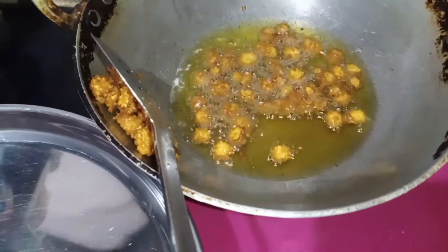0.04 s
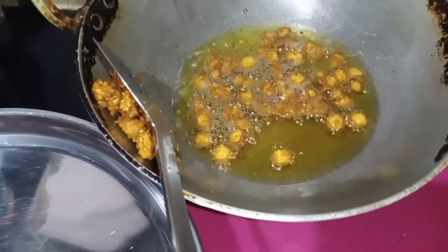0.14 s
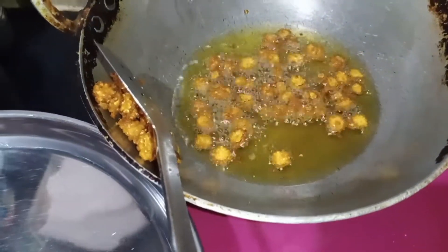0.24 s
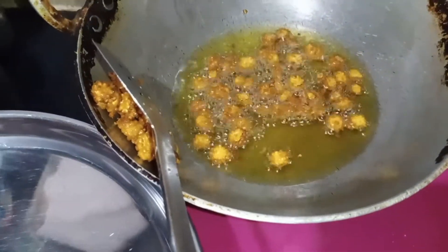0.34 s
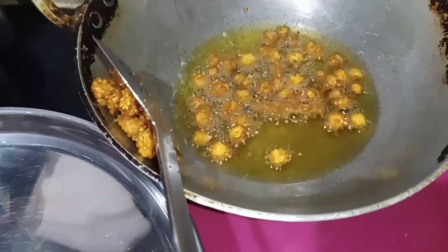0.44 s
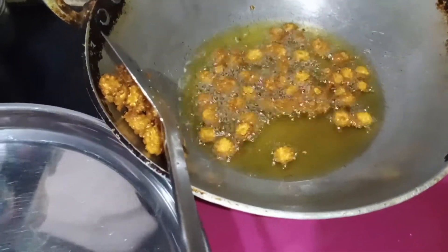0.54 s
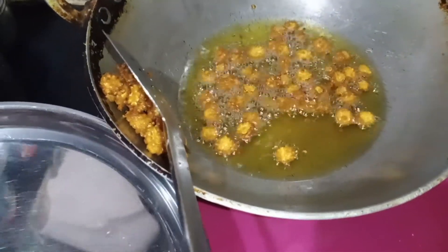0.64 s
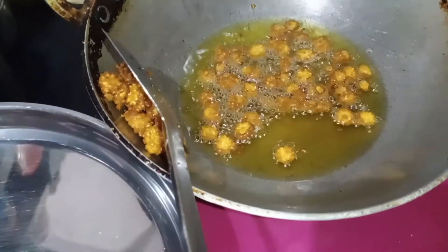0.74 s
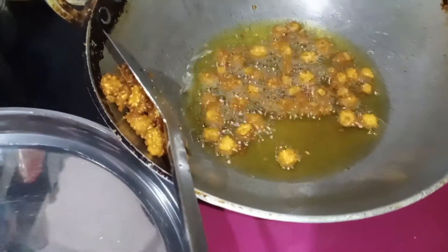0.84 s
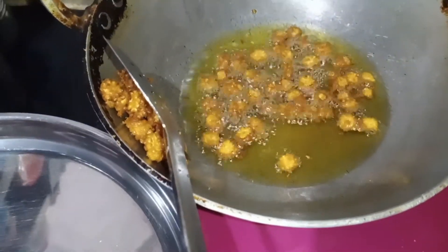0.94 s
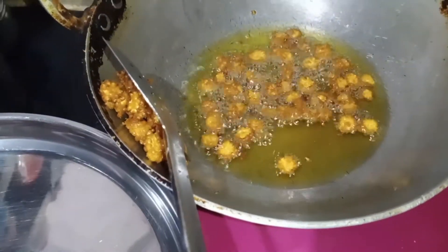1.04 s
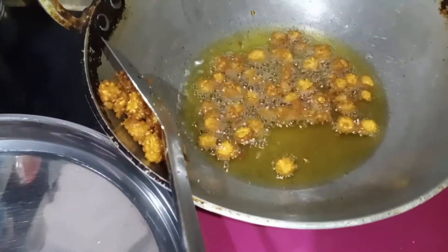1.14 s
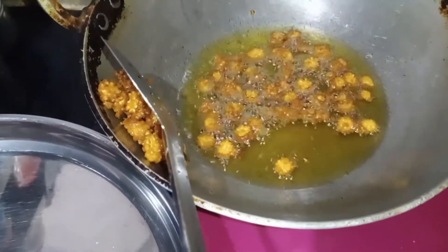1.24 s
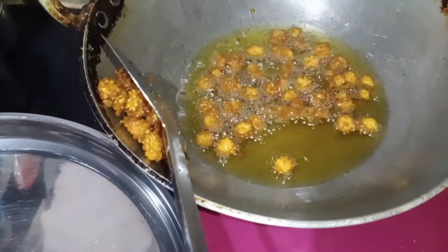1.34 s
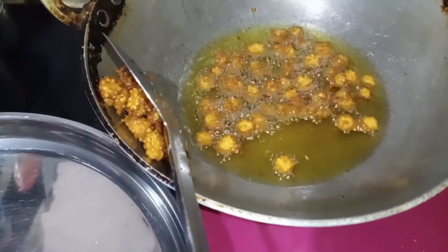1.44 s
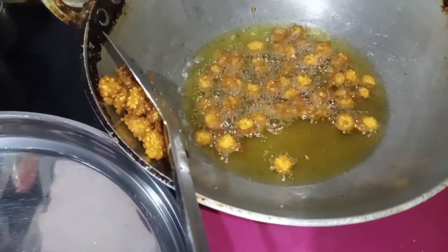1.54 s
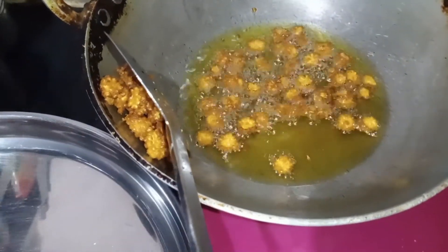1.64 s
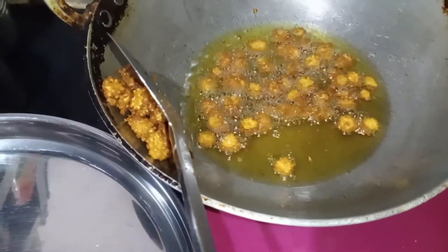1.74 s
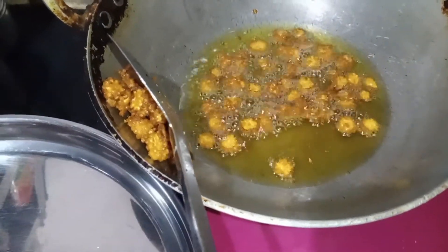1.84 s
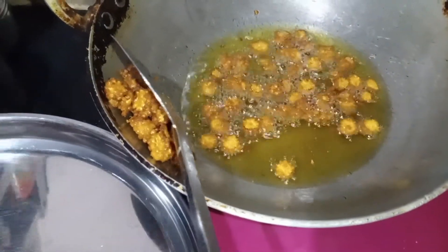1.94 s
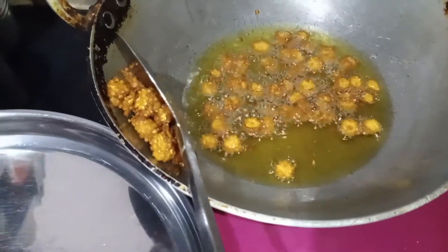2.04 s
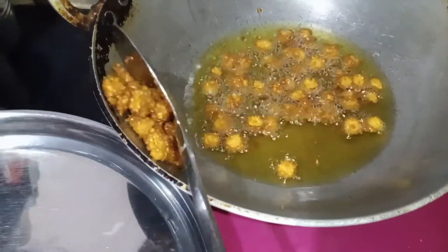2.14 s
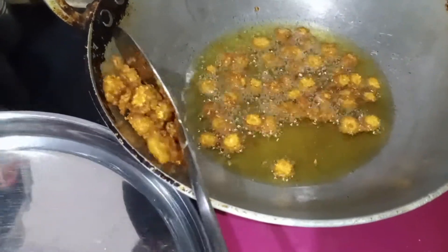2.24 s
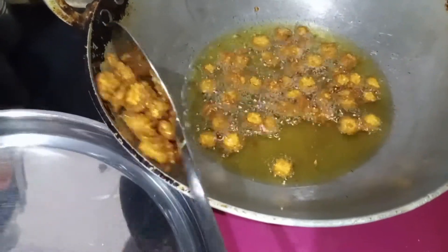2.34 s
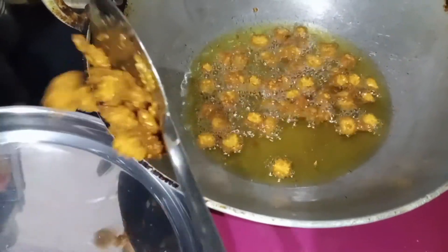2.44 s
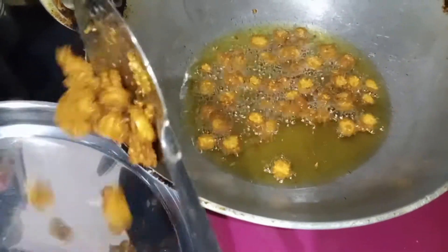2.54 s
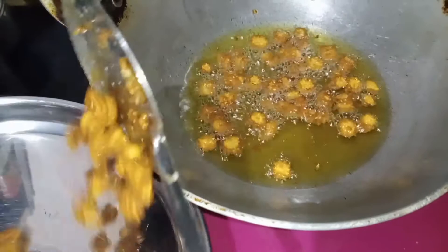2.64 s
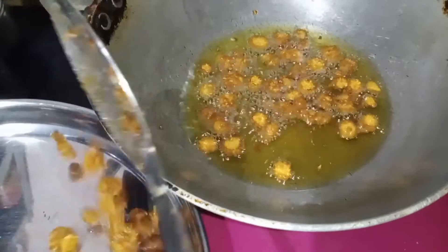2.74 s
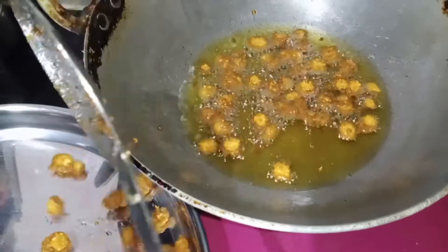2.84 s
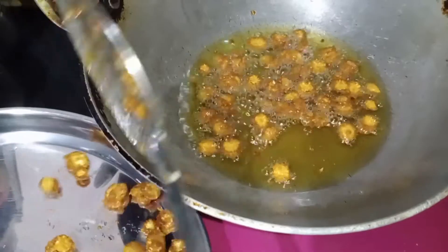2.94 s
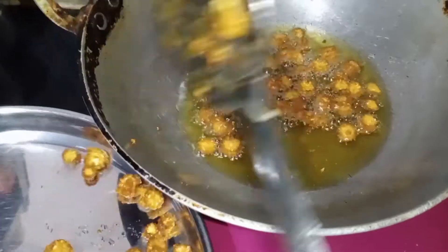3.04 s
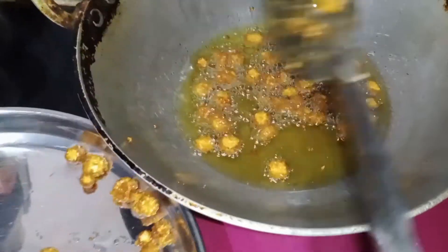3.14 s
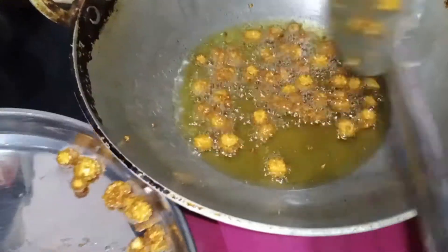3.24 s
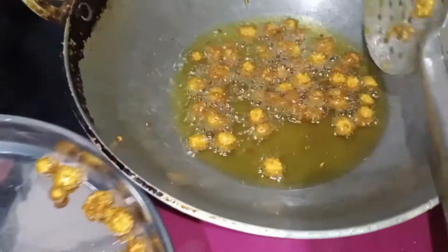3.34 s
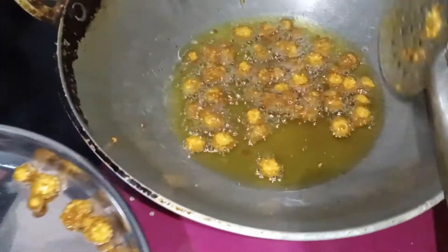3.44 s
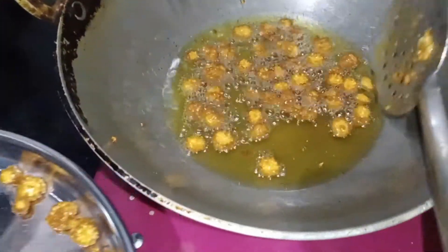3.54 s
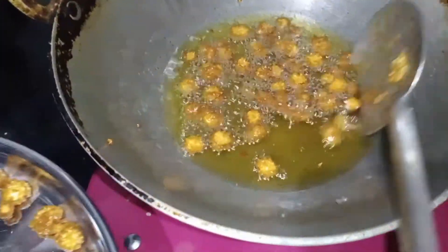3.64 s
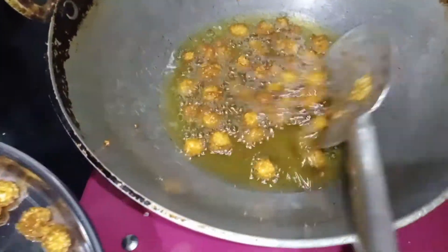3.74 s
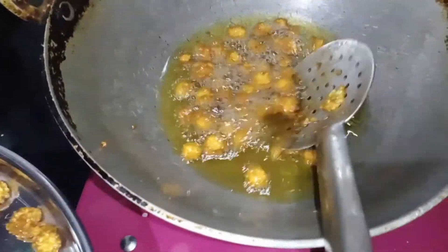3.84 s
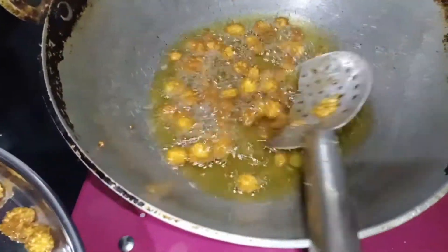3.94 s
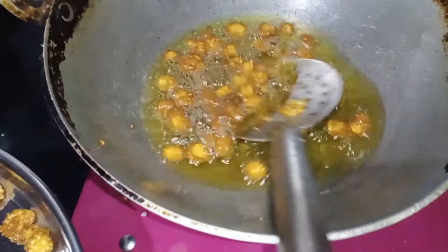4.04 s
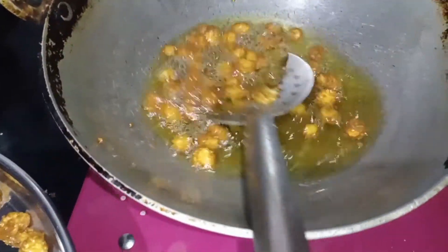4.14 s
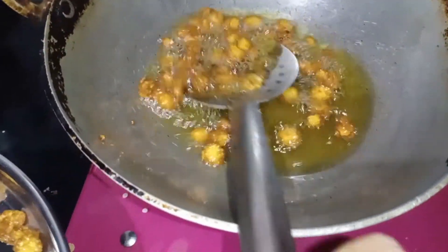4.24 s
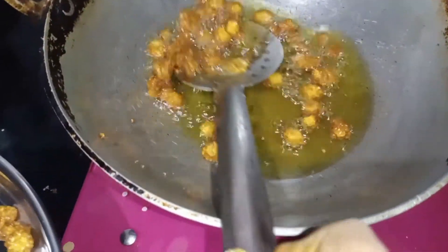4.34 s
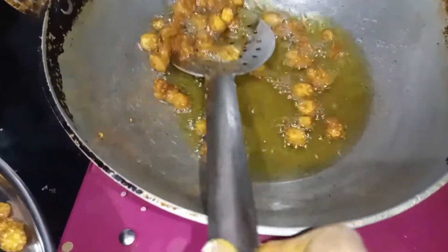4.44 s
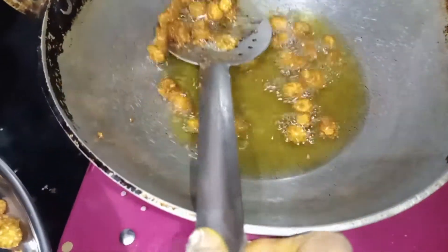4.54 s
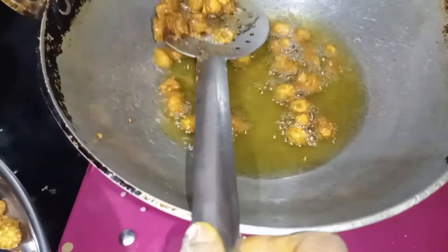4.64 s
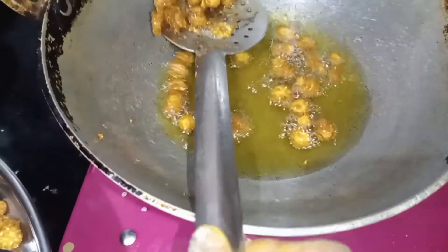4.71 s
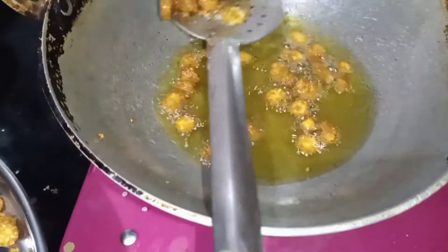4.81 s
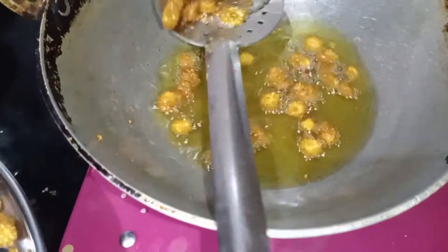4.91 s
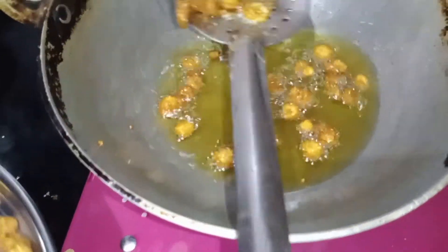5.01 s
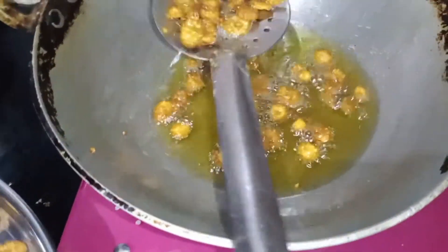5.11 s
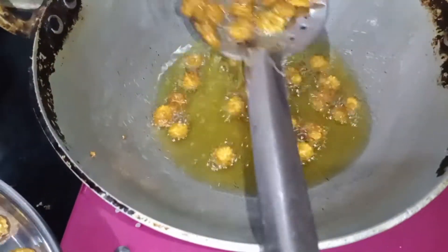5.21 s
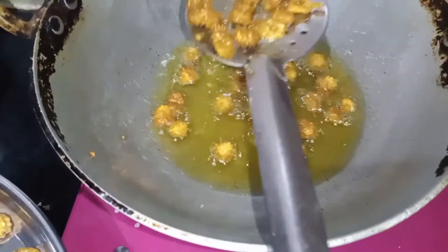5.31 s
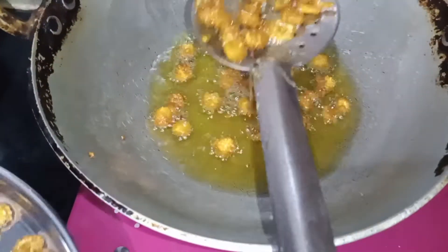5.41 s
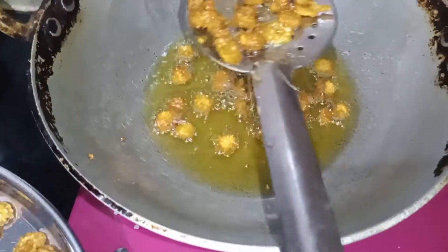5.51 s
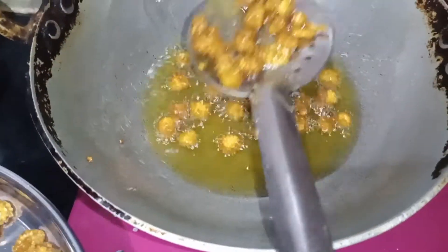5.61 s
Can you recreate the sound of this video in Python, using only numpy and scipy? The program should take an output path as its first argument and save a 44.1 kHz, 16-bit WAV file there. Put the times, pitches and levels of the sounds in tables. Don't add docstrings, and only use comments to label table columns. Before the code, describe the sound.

Hot oil fizzes and crackles steadily while a metal slotted spoon scrapes a steel wok, tips fried bits onto a ringing plate, then stirs.

```python
import sys
import numpy as np
from scipy import signal
from scipy.fft import rfft, irfft, next_fast_len
from scipy.io import wavfile
from scipy.ndimage import uniform_filter1d

SR = 44100
rng = np.random.default_rng(int(sys.argv[2]) if len(sys.argv) > 2 else 0)


def invert_db(x):
    u = np.asarray(x, float) / 20
    return 10 ** u


def transcribe(signal):
    frames = np.atleast_2d(signal).T
    limited = np.clip(frames, -1, 1)
    pcm = np.round(limited * 32767).astype(np.int16)
    wavfile.write(sys.argv[1], SR, pcm)


N = 250035
SIZE = next_fast_len(N + SR // 2)
BINS = np.maximum(np.arange(SIZE // 2 + 1) * SR / SIZE, 1)

# low_hz, high_hz
REGISTERS = [
    (150, 560),
    (560, 1520),
    (1520, 5000),
    (5000, 10200),
    (10200, 17000),
]


def fizz():
    # start_s, level_db
    frying = [(0, -38.5), (.25, -37.8), (1.9, -38.3), (2.5, -37.5), (3.0, -39), (3.45, -40), (3.85, -38),
              (4.3, -35.5), (4.6, -35.5), (5.3, -37.5), (5.67, -38.5)]
    # pitch_hz, level_db (per Hz)
    fizz_colour = [(530, -61.5), (900, -25.5), (978, -34), (1270, -21.5), (2040, -19.5), (2870, -5.5),
                   (3190, -7.5), (4290, -12), (4940, -17.5), (6410, 0.5), (6800, 2.5), (7650, -2),
                   (8720, -11.5), (11600, -20), (15200, -14.5)]
    bursts = grains(9000 * invert_db(2.1 * drift(14) + 1.5 * drift(60)), spread_db=0.0)
    bubble_size = rng.integers(0, 18, N)
    pops = np.zeros(N)
    for k, hz in enumerate(np.geomspace(900, 16000, 18)):
        pops += rms_one(ring(bursts * (bubble_size == k), hz, hz / 3.5)) * np.sqrt(hz)
    crackle = invert_db(-7.0) * puffs(400 * invert_db(3.5 * drift(1.5)), t60=0.052)
    spitting = invert_db(-18.5) * puffs(45, t60=0.057)
    hiss = rng.standard_normal(N)
    mixed = colour(rms_one(pops) + crackle + spitting + hiss, at_hz(fizz_colour))
    return in_time(frying)[0] * band_one(mixed, 5500, 8500)


def spits():
    # start_s, peak_db, pitch_hz, hiss_db (above the peak)
    spit_events = [(0.957, -26, 3260, -8), (1.512, -24.5, 2980, 2), (4.0648, -14.5, 3100, -3),
                   (4.2302, -41, 3270, 23), (4.484, -14, 3420, -10), (4.5008, -16, 3150, -23),
                   (4.67, -24, 3220, -4), (4.8534, -24.5, 2850, 12), (4.919, -18.5, 2400, -10),
                   (4.992, -21, 3210, -10), (5.1165, -32, 2990, 17), (5.1856, -21, 3400, -11.5),
                   (5.35, -30, 3300, -2), (5.4043, -20.5, 2580, 6), (5.5844, -32, 3100, 6)]
    out = np.zeros(N)
    fade = invert_db(-60 * np.arange(900) / (0.056 * SR))
    for s, peak_db, pitch_hz, hiss_db in spit_events:
        puff = rng.standard_normal(900) * fade
        for hz, width_hz, level_db in ((pitch_hz, 500, 0), (7000, 2500, hiss_db)):
            blip = ring(ring(puff, hz, width_hz), hz, width_hz)
            out[round(s * SR):][:900] += invert_db(peak_db + level_db - 11.5) * blip / np.abs(blip).max()
    return above(out, 2140)


def gurgle():
    # peak_s, half_length_s, peak_db
    bubbling = [(.2, 0.044, -66), (.33, .025, -66), (.445, 0.015, -64), (.575, 0.021, -61.5),
                (.67, 0.035, -60), (.845, 0.031, -56), (.93, .02, -60), (1.0, 0.03, -61), (1.07, .03, -63),
                (1.35, 0.044, -64), (1.68, 0.11, -63.5), (2.1, 0.046, -73), (3.15, 0.13, -62),
                (3.32, 0.046, -67), (4.52, .06, -84), (4.75, 0.046, -57), (4.97, 0.082, -63),
                (5.23, 0.045, -75), (5.56, 0.14, -57)]
    # peak_s, half_length_s, peak_db
    slosh = [
        (4.4, 0.14, -57),
        (4.6, 0.13, -57.5),
        (4.85, 0.11, -56.5),
    ]
    return swells(bubbling) * hum(762, 100) + swells(slosh) * above(hum(1320, 540), 1000)


def spoon_drag():
    # pitch_hz, width_hz, level_db
    wall = [(370, 46, -5), (759, 35, -0.5), (890, 30, -3), (1170, 49, -9), (1593, 56, -7), (2700, 40, 2),
            (3210, 95, 6), (3730, 200, 7), (4100, 73, 2.5), (6380, 120, 10), (6400, 68, -35), (7350, 74, 5)]
    # start_s, level_db (pressure), weight_db (dull sound above the level)
    drag = [
        (1.88, -65, -22),
        (1.928, -49, -30),
        (2.012, -54, -13),
        (2.044, -43, -26),
        (2.132, -48, -31),
        (2.2, -33, 5),
        (2.26, -48, 4),
        (2.348, -39, -8),
        (2.54, -50.5, -4),
    ]
    # start_s, peak_db, weight_db (dull above peak), bright_db (above peak), pitch_hz (favoured)
    drag_knocks = [
        (1.9068, -30, -46, 5, 3200),
        (1.921, -27, -37, 2, 3200),
        (2.0365, -31, -40, 14.5, 3200),
        (2.0534, -33.5, -31, 14.5, 3230),
        (2.1717, -27, -5, 5, 3200),
        (2.1972, -14, -34, -0.5, 3800),
        (2.362, -27, -36, -4, 2700),
        (2.4292, -32, -24, 15, 2600),
    ]
    return steel(wall, rubbing(drag, body_db=-10.5, bright_db=6.0), with_body(drag_knocks, body_db=-1.0),
                 uneven_db=2.0, sharpness=2.8, ring_db=-6.5, rub_ring_db=-2.0, noise_db=-4.5,
                 top_share_db=-11.5, per_s=2800, t60=0.034, crack_s=0.0067)


def plate_tumble():
    # pitch_hz, width_hz, level_db
    plate = [(220.5, 60, -18.5), (389.7, 51, -14), (461, 65, -17), (722.5, 50, 3), (938, 28, -1.5),
             (1168, 11, -1.5), (1453, 36, -11), (1753, 110, -5.5), (2075, 24, -3), (2423, 18, -1),
             (2784, 40, -0.5), (2848, 24, 0.5), (3150, 28, -7), (3334, 30, -8), (3275, 14, 1),
             (3450, 54, -8.5), (3695, 30, -7.5), (4020, 30, -13), (4100, 110, -5), (4290, 45, -10.5),
             (4740, 100, -9.5), (5260, 25, -13), (5760, 35, -8), (6170, 67, -11), (6600, 75, -9),
             (6890, 36, -8.5), (7290, 63, -3), (7260, 11, -24), (8200, 28, -7), (9240, 35, -18),
             (10100, 90, -21)]
    # start_s, level_db (pressure), weight_db (dull sound above the level)
    tumble = [
        (2.543, -51, 6),
        (2.551, -46, 1),
        (2.59, -34, -0.5),
        (2.641, -28.5, -3),
        (2.66, -28, -3.5),
        (2.8, -30, -2.5),
        (2.85, -35.5, -10),
        (2.98, -38.5, -16),
        (3.1, -59, -8),
    ]
    # start_s, peak_db, weight_db (dull above peak), bright_db (above peak), pitch_hz (favoured)
    plate_knocks = [(2.5451, -25, 1.5, 10.5, 3290), (2.5905, -22.5, 0.5, 5.5, 2700),
                    (2.6094, -23.5, -5, -1, 3290), (2.6486, -25, -6, 10.5, 3100),
                    (2.6566, -18.5, -9, 5, 3275), (2.6894, -20.5, -4, 3, 3275),
                    (2.7194, -16.5, -1, -1, 3480), (2.7444, -19, -5, 6, 2600),
                    (2.7694, -18.5, -3, -4, 3020), (2.7894, -20.5, -2.5, 6, 2600),
                    (2.7985, -16, -9, -17, 2080), (2.8671, -23, -12, 6.5, 2080),
                    (2.917, -28, -5, 7.5, 2800), (2.9494, -25, -4, -1, 3350)]
    return steel(plate, rubbing(tumble, body_db=4.0, bright_db=-2.0), with_body(plate_knocks, body_db=-13.5),
                 uneven_db=3.2, sharpness=8.5, ring_db=-8.5, rub_ring_db=1.5, noise_db=-6.0,
                 top_share_db=-4.0, per_s=1500, t60=0.17, crack_s=0.004)


def wok_stir():
    # pitch_hz, width_hz, level_db
    wok = [(260, 28, -8), (375.2, 37, 4), (760, 20, 0.5), (892, 38, 0), (1004, 45, 1.5), (1200, 105, 5),
           (1303, 37, -5), (1698, 76, 5.5), (2080, 23, -8), (2700, 73, -1.5), (1440, 56, -0.5),
           (2850, 60, -2), (2983, 63, -2), (3490, 50, -14), (4047, 60, -3.5), (5800, 44, -2),
           (6520, 99, 6.5), (7020, 40, 2), (7680, 35, -3)]
    # start_s, level_db (pressure), weight_db (dull sound above the level)
    stir = [
        (3.46, -68, 2),
        (3.482, -44, 0.5),
        (3.492, -50, 4),
        (3.498, -28, -7.5),
        (3.564, -38, -3.5),
        (3.622, -27.5, -6.5),
        (3.69, -29, -3),
        (3.774, -29, -6.5),
        (3.88, -44.5, -9),
    ]
    scoop = [
        (3.88, -50.5, 0.5),
        (3.95, -38, -10.5),
        (4.036, -30.5, -13.5),
        (4.102, -46, 7.5),
        (4.198, -56, 7.5),
        (4.35, -54, -8),
    ]
    drain = [
        (5.38, -49, -23),
        (5.414, -47, -11.5),
        (5.54, -49, -2.5),
        (5.67, -72, -24),
    ]
    # start_s, peak_db, weight_db (dull above peak), bright_db (above peak), pitch_hz (favoured)
    wok_knocks = [(3.477, -29.5, 1, -16, 2980), (3.499, -9, -24, -1, 2646), (3.5845, -15, -13, -4, 3010),
                  (3.6112, -23, -18, 3, 3060), (3.6546, -17.5, -1, 6, 1645), (3.6965, -13.5, -9, 0.5, 4100),
                  (3.7394, -24.5, -24, 4, 4060), (3.788, -21.5, -7, 2.5, 4047),
                  (3.9499, -35, -29, 11, 1690), (4.0765, -30.5, 8.5, -12, 1004),
                  (4.084, -37.5, 10, -12, 760), (4.0945, -32.5, 6, -12, 1004), (4.1065, -35, 7, -12, 900),
                  (4.4847, -35, -14.5, 0, 1500), (4.7155, -47.5, 7, -6, 890), (4.729, -48, 7, -8, 1200)]
    pressure = rubbing(stir, body_db=4.0, bright_db=-3.0)
    pressure = pressure + rubbing(scoop, body_db=-16.5, bright_db=3.0)
    pressure = pressure + rubbing(drain, body_db=7.5, bright_db=-12.0)
    return steel(wok, pressure, with_body(wok_knocks, body_db=-10.5),
                 uneven_db=2.5, sharpness=2.24, ring_db=-4.0, rub_ring_db=-6.0, noise_db=-4.0,
                 top_share_db=-16.0, per_s=4000, t60=0.055, crack_s=0.0084)


def spoon_song():
    # peak_s, half_length_s, peak_db
    scrape = [
        (3.96, 0.02, -42.5),
        (3.995, 0.034, -39),
        (4.048, .018, -40),
    ]
    return swells(scrape) * (hum(1687, 67) + 0.86 * hum(1340, 110))


def ticks():
    # start_s, peak_db, middle_db (middle register above the peak)
    tick_events = [(0.957, -28.5, 3.5), (1.9067, -22, 0), (1.9704, -23, -6), (2.044, -20, -5),
                   (2.1092, -25, -6), (2.1976, -12.5, -4), (2.2654, -32, -8), (2.2928, -21, -14),
                   (2.3612, -21, -6), (2.387, -19, -7), (2.4584, -26, -13), (2.4948, -17.5, -13),
                   (2.5907, -13, -2), (2.648, -11, -12), (2.6544, -10, -12), (2.667, -16, -13),
                   (2.684, -15, -9), (2.7126, -13, -3), (2.7234, -21, -6), (2.7527, -19, -6),
                   (2.7686, -11, -6), (2.793, -11, -3), (2.8037, -8, -7), (2.8834, -16.5, 1.5),
                   (3.5684, -28, -5), (3.6244, -21, -6), (3.654, -10, -14), (3.7294, -23, -2),
                   (3.776, -19, -11), (3.9495, -24, -14), (4.0087, -17, -8), (4.0227, -21, -1),
                   (4.0334, -23, -2), (4.065, -24, 7), (4.086, -21, -4), (4.136, -30, -1),
                   (4.1954, -28, -9), (4.2314, -21, -16), (4.4845, -21, 2), (4.503, -20, -3)]
    bright, middle = np.zeros(N), np.zeros(N)
    fade = invert_db(-60 * np.arange(900) / (0.019 * SR))
    fade = fade + 1.06 * fade ** 10.0
    for s, peak_db, middle_db in tick_events:
        burst = invert_db(peak_db - 9) * rng.standard_normal(900) * fade
        bright[round(s * SR):][:900] += burst
        middle[round(s * SR):][:900] += invert_db(middle_db) * burst
    _, _, middle_response, bright_response, top_response = clatter_responses()
    out = signal.oaconvolve(bright, bright_response + invert_db(-22.0) * top_response)
    out = out + signal.oaconvolve(middle, middle_response)
    return above(out[:N], 2540)


def hollows():
    # peak_s, half_length_s, peak_db, pitch_hz
    short_tones = [(0.886, 0.025, -68, 432), (3.518, 0.021, -35, 2710), (2.375, 0.017, -41.5, 2700),
                   (2.2, 0.017, -50, 1700), (2.41, .015, -49, 2150), (2.505, 0.033, -49, 1600),
                   (2.185, 0.011, -43, 354), (3.55, 0.014, -34, 2780), (3.76, .018, -38, 4050),
                   (3.72, .025, -34, 2820), (3.665, .015, -42, 1000), (4.55, 0.03, -52, 1670),
                   (4.495, 0.014, -50, 1200), (4.78, .025, -55.5, 1100), (5.352, .005, -38, 8500),
                   (2.558, 0.014, -37, 9870), (2.56, .01, -52, 11900), (2.599, 0.02, -32, 394),
                   (2.78, 0.077, -51.5, 215), (5.05, .035, -63, 980), (5.27, 0.049, -61, 910),
                   (4.68, .03, -65, 460), (1.4, 0.042, -58.5, 220), (2.675, .035, -28, 2416),
                   (2.73, .02, -36, 2072), (2.815, .018, -33, 2078), (2.88, 0.018, -36.5, 2078),
                   (2.965, 0.018, -40, 3275), (2.93, 0.045, -41, 2850), (2.62, 0.028, -41, 4200),
                   (3.508, 0.012, -30, 4040), (3.703, 0.0078, -34, 4060), (3.6, .02, -43, 1700),
                   (3.8, .015, -41, 1700), (2.26, 0.045, -46.5, 377), (2.225, .02, -42, 890),
                   (2.22, .02, -46.5, 1590), (1.93, .012, -55, 1650), (2.6, .04, -41, 2770),
                   (2.66, .03, -38, 1600), (2.8, .06, -42, 1170), (3.63, .04, -40, 1450),
                   (2.93, 0.052, -51.5, 455), (2.984, 0.024, -52, 140), (3.215, 0.067, -62, 506),
                   (3.55, 0.05, -38.5, 272), (3.694, 0.055, -38, 297), (4.73, 0.026, -49, 108.4),
                   (4.922, 0.0099, -51, 139.6)]
    out = np.zeros(N)
    for s, half_s, peak_db, hz in short_tones:
        tone = np.sin(2 * np.pi * hz * np.arange(N) / SR)
        rough = 0.64 * hum(hz, min(hz / 13.3, 120.))
        out += swells([(s, half_s, peak_db)]) * (tone + rough)
    return out


def rumble():
    # pitch_hz, width_hz
    hum_modes = [
        (90, 28.6),
        (137, 19.4),
        (225, 123),
    ]
    # peak_s, half_length_s, peak_db
    low_swells = [(0.24, 0.06, -52), (0.493, 0.12, -57), (0.89, 0.22, -53.5), (1.218, 0.087, -44.5),
                  (1.573, 0.093, -41.5), (1.842, .15, -38.5), (2.285, 0.041, -48.5), (2.56, 0.073, -53),
                  (3.185, 0.026, -49), (3.308, 0.038, -41), (3.695, 0.2, -41), (4.175, 0.16, -46),
                  (4.45, 0.25, -53), (4.7, .06, -49), (4.909, 0.072, -47), (5.414, 0.15, -47.5)]
    upper_swells = [(.21, 0.028, -46), (.445, 0.021, -50), (.54, 0.04, -49.5), (.92, 0.2, -50),
                    (1.27, 0.27, -44.5), (1.55, 0.18, -52.5), (1.97, 0.065, -45.5), (2.28, 0.032, -53.5),
                    (2.6, 0.049, -39), (3.19, 0.021, -43), (3.3, 0.024, -45), (3.45, 0.073, -49),
                    (3.73, 0.28, -45.5), (4.13, 0.061, -44), (4.55, 0.041, -52), (4.97, 0.078, -49),
                    (5.48, 0.059, -46)]
    thuds = [(0.229, 0.023, -46), (1.77, 0.041, -47.5), (2.19, 0.017, -45.5), (2.66, 0.043, -56),
             (3.3, 0.023, -47), (3.62, 0.14, -46.5), (4.14, 0.05, -43.5), (4.861, 0.032, -46.5),
             (5.55, 0.084, -47)]
    groups = (low_swells, upper_swells, thuds)
    return sum(swells(rows) * hum(*mode) for rows, mode in zip(groups, hum_modes))


def room():
    # pitch_hz, level_db (per Hz)
    room_colour = [(18, -21), (30, -11), (65, -3.5), (129, -4), (344, -17), (673, -19.5), (754, -33),
                   (1010, -35), (1250, 1.5), (1500, -62), (1950, -12), (3300, -120)]
    return invert_db(-70.0) * band_one(colour(rng.standard_normal(N), at_hz(room_colour)), 236, 1172)


def steel(modes, rub, knocks, uneven_db, sharpness, ring_db, rub_ring_db, noise_db, top_share_db,
          per_s, t60, crack_s):
    grit = grains(per_s * invert_db(3.5 * drift(35)), spread_db=uneven_db)
    s, peak_db, body_db, dull_db, bright_db, favoured_hz = np.transpose(knocks)
    at = np.round(s * SR).astype(int)
    out, t = np.zeros(N), np.arange(6000) / SR
    levels = [*rub, rub[3] * invert_db(top_share_db)]
    offsets_db = (body_db, dull_db, 0, bright_db, bright_db + top_share_db)
    heard = slice(at[0] - SR // 10, None)
    crack = 0.38 * invert_db(-60 * t / crack_s)
    tail_lengths = (2.8, 3.4, 0.31, 1.64, 1.5)
    layers = zip(REGISTERS, clatter_responses(), levels, offsets_db, tail_lengths)
    for (low_hz, high_hz), response, level, above_db, lasting in layers:
        drive = level * grit
        blows = invert_db(peak_db + above_db)
        noise = drive.copy()
        fade = 0.33 * invert_db(-60 * t / (t60 * lasting)) + crack
        for start, blow in zip(at, blows):
            noise[start:start + 6000] += blow * rng.standard_normal(6000) * fade
        out += invert_db(noise_db) * signal.oaconvolve(noise, response)[:N]
        chosen = [mode for mode in modes if low_hz <= mode[0] < high_hz]
        top_db = max([mode[2] for mode in chosen], default=0)
        for hz, width_hz, level_db in chosen:
            narrow_hz = width_hz / sharpness + hz / 700 + 0.5
            strike = invert_db(rub_ring_db) * np.sqrt(4 * np.pi * narrow_hz / SR) * drive
            favour_db = 10.1 * np.exp(-(np.log(hz / favoured_hz) / 0.027) ** 2)
            chance_db = rng.normal(0, 2.2, len(at))
            strike[at] += blows * invert_db(favour_db + chance_db - 6.0) * rng.choice([-1, 1], len(at))
            wobble_db = 1.93 * drift(7.3)
            strike = strike[heard]
            pair = ring(strike, hz, narrow_hz) - 0.25 * ring(strike, hz * 1.012, narrow_hz)
            out[heard] += invert_db(level_db - top_db + ring_db + wobble_db[heard]) * pair
    return out


def clatter_responses():
    # pitch_hz, level_db (per Hz)
    clatter = [(90, -27), (150, -18), (380, -5), (500, -9.5), (720, -2.5), (1350, -5), (1900, -6),
               (3200, 1), (4900, -12.5), (6800, 2.5), (8800, -12.5), (10200, -28.5), (12000, -30.5),
               (15500, -30)]
    click = np.r_[1., np.zeros(4095)]
    shaped = colour(click, at_hz(clatter))[:4096]
    responses = []
    for edges in REGISTERS:
        band = signal.sosfilt(signal.butter(3, edges, "band", fs=SR, output="sos"), shaped)
        responses.append(band / np.linalg.norm(band))
    return responses


def rubbing(rows, body_db, bright_db):
    s, level_db, weight_db = np.transpose(rows)
    body = level_db + body_db + 2.8 * weight_db
    bright = level_db + bright_db - 0.075 * weight_db
    return in_time(np.transpose([s, body, level_db + weight_db, level_db, bright]))


def with_body(rows, body_db):
    return [(s, peak_db, weight_db + body_db, weight_db, bright_db, hz)
            for s, peak_db, weight_db, bright_db, hz in rows]


def swells(rows):
    t = np.arange(0, N + 64, 64) / SR
    power = np.zeros(len(t))
    for s, half_s, db in rows:
        distance = np.abs(t - s) / np.where(t < s, 0.79 * half_s, half_s)
        power += invert_db(db - 6 * distance ** 1.77) ** 2
    return np.interp(np.arange(N) / SR, t, np.sqrt(power))


def grains(per_s, spread_db):
    sizes = invert_db(spread_db * np.minimum(rng.exponential(1, N), 6)) * rng.choice([-1, 1], N)
    return rms_one(sizes * (rng.random(N) < per_s / SR))


def puffs(per_s, t60):
    snaps = np.abs(grains(per_s, spread_db=0.5))
    envelope = signal.lfilter([1], [1, -invert_db(-60 / (t60 * SR))], snaps)
    return rms_one(envelope * rng.standard_normal(N))


def ring(x, hz, width_hz):
    r, w = np.exp(-np.pi * width_hz / SR), 2 * np.pi * hz / SR
    return signal.lfilter([0, np.sin(w)], [1, -2 * r * np.cos(w), r * r], x + 1e-18)


def hum(hz, width_hz):
    return rms_one(ring(ring(rng.standard_normal(N), hz, width_hz), hz, width_hz))


def drift(rate):
    r = np.exp(-80 * np.pi * rate / SR)
    slow = signal.lfilter([1], [1, -2 * r, r * r], rng.standard_normal(N // 40 + 2002))[2000:]
    return np.interp(np.arange(N) / 40, np.arange(len(slow)), rms_one(slow))


def rms_one(x):
    return x / np.sqrt(np.mean(x ** 2) + 1e-20)


def band_one(x, low_hz, high_hz):
    band = signal.sosfilt(signal.butter(4, [low_hz, high_hz], "band", fs=SR, output="sos"), x)
    return x / np.sqrt(np.mean(band ** 2))


def in_time(rows):
    s, *columns = np.transpose(rows)
    t = np.arange(N) / SR
    return np.array([invert_db(np.interp(t, s, c, left=-150, right=-150)) for c in columns])


def at_hz(points, column=1):
    points = np.array(points)
    return np.interp(np.log(BINS), np.log(points[:, 0]), points[:, column])


def colour(x, spectrum_db):
    cepstrum = irfft(spectrum_db * np.log(10) / 20, SIZE)
    cepstrum[1:SIZE // 2] *= 2
    cepstrum[SIZE // 2 + 1:] = 0
    return irfft(rfft(x, SIZE) * np.exp(rfft(cepstrum)), SIZE)[:N]


def above(x, hz):
    return signal.sosfilt(signal.butter(4, hz, "high", fs=SR, output="sos"), x)


def flutter(x):
    # pitch_hz, flutter_db
    patches = [(200, 6), (1000, 5), (2200, 2.5), (3000, 2), (7000, -0.5), (15000, 2)]
    hz, _, cells = signal.stft(x, SR, nperseg=1024)
    chance = uniform_filter1d(rng.standard_normal(cells.shape), size=3, axis=0)
    chance = uniform_filter1d(chance, size=12, axis=1)
    depth_db = np.interp(hz, *np.transpose(patches))[:, None]
    return signal.istft(cells * invert_db(depth_db * rms_one(chance)), SR, nperseg=1024)[1][:N]


def ports(x):
    # pitch_hz, balance_db (left minus right), likeness (0-1)
    port_colour = [(30, -2, .6), (70, 0.5, 0.98), (300, 2.5, 0.95), (600, 2, 0.99), (1370, 7, 0.75),
                   (1980, 0.5, 0.96), (2900, 4.5, 0.95), (4900, 2, 0.88), (5530, 3, 0.89), (6500, -1, 1),
                   (7680, -7, 0.88), (9050, -17, 0.75), (10700, -11.5, 0.5), (11200, -25, 0.5),
                   (12800, 2.5, 0.6), (15500, -3.5, 0.93)]
    lag_s = np.repeat(rng.uniform(0, .006, len(BINS) // 600 + 1), 600)[:len(BINS)]
    scatter = rfft(x * drift(13.7), SIZE) * np.exp(-2j * np.pi * np.cumsum(lag_s) * SR / SIZE)
    alike = np.clip(at_hz(port_colour, column=2), 0, 1)
    gains = invert_db(at_hz(port_colour) * np.array([[.5], [-.5]]))
    same = np.sqrt(1 + alike)
    other = np.sqrt(1 - alike) * np.array([[1], [-1]])
    centre = np.hypot((gains * same).mean(axis=0), (gains * other).mean(axis=0))
    return irfft(gains * (same * rfft(x, SIZE) + other * scatter) / centre, SIZE)[:, :N]


def scene():
    steady = flutter(fizz() + room()) + gurgle() + rumble()
    contact = above(spoon_drag() + plate_tumble() + wok_stir(), 102)
    details = spoon_song() + hollows() + ticks() + spits()
    return ports(steady + contact + details)


def top_cut(x):
    return signal.sosfilt(signal.butter(12, 15740, fs=SR, output="sos"), x)


def record(dry):
    mix = signal.sosfilt(signal.butter(2, 66, "high", fs=SR, output="sos"), dry)
    mix = .55 * np.tanh(mix / .55)
    mix = signal.sosfilt(signal.ellip(12, .5, 80, 15740, fs=SR, output="sos"), mix)
    return top_cut(mix)


dry = scene()
out = record(dry)
transcribe(out)
```